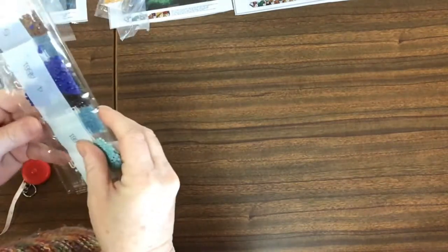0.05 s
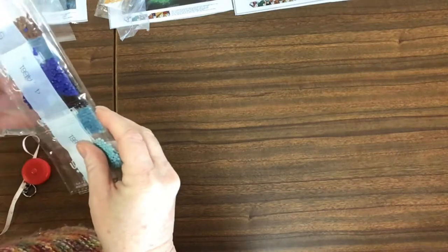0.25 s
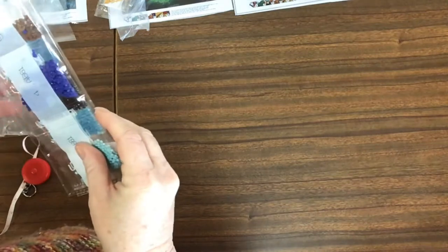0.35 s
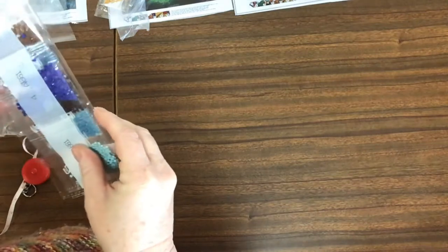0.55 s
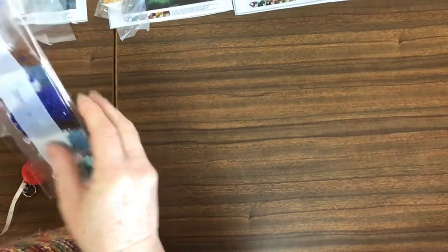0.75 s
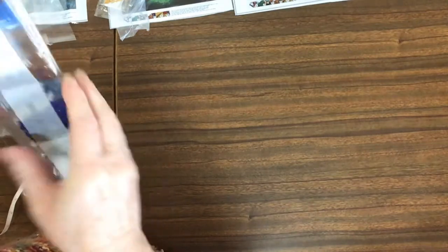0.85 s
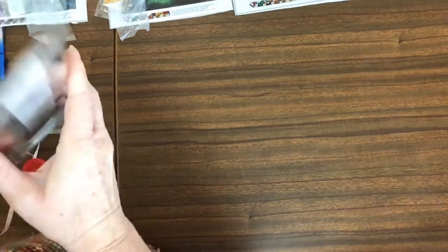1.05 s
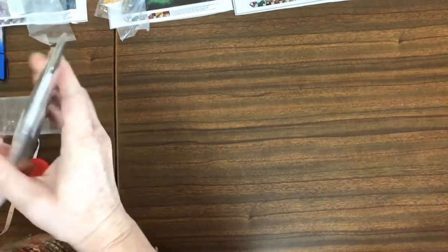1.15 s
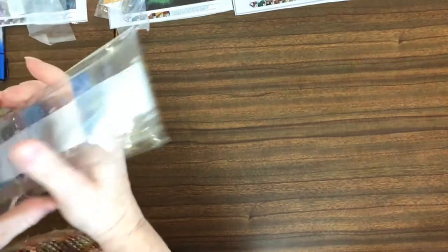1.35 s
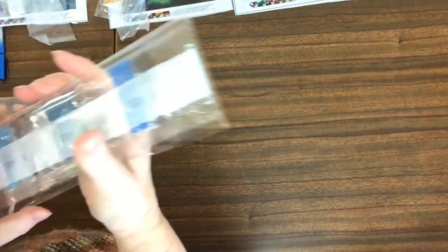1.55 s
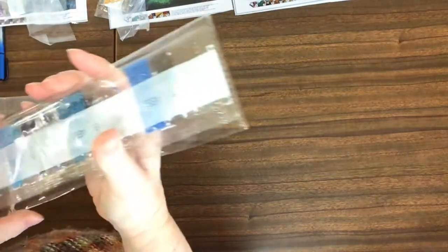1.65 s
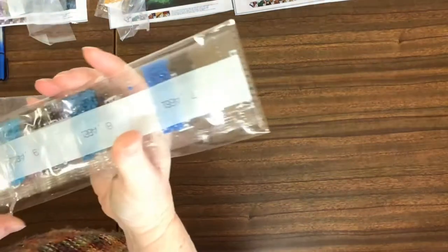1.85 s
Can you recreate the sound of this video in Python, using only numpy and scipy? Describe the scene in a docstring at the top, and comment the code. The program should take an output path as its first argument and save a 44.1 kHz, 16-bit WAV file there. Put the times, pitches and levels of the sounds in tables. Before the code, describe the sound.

Thin plastic packaging crinkles close by. A dull handling wash fades within 0.2 s as small crackles begin; sharp snaps stand out around 0.25, 0.45 and 0.55 s. Rustle swells near 0.7 s, then snaps crowd together at 1.0-1.45 s, strongest rustle near 1.15, with soft low knocks. A loud snap at 1.6 and a weaker one at 1.8 follow. Short small-room echo, faint low rumble.

```python
"""A thin plastic sleeve is turned over in two hands above a wooden desk, under a phone.
A dull wash is strongest at first and soon sinks, as creases begin to snap over a low rumble.
Snaps then come thickly, with tiny crackles, swells of rustle and soft knocks of the contents;
a few last snaps stand further apart. Each snap is a step with ragged buckling, rustle is
coloured noise, knocks are fading sines, and desk, near objects and a small room echo them."""
import sys
import numpy as np
from scipy import signal
from scipy.fft import rfft, irfft
from scipy.io import wavfile
from scipy.ndimage import uniform_filter1d

SR = 44100
rng = np.random.default_rng(int(sys.argv[2]) if len(sys.argv) > 2 else 0)


def decibels_to_gain(level_db):
    """Convert a level in decibels to a linear amplitude gain (20 dB per decade)."""
    exponent = np.asarray(level_db, float) / 20
    return 10 ** exponent


def transcribe(signal):
    """Save signal, clipped to [-1, 1], as a 16-bit WAV file at the path in sys.argv[1]."""
    frames = np.atleast_2d(signal).T
    limited = np.clip(frames, -1, 1)
    pcm = np.round(limited * 32767).astype(np.int16)
    wavfile.write(sys.argv[1], SR, pcm)


N = 83790


def curve(table, column=1):
    """Joins the points of a time table by straight lines."""
    points = np.array(table)
    return np.interp(np.arange(N) / SR, points[:, 0], points[:, column])


def on_hz(table, hz):
    """Joins the points of a spectrum on a log pitch axis."""
    points = np.array(table, float)
    return np.interp(np.log(hz + 1), np.log(points[:, 0]), points[:, 1])


def noise(table):
    """Noise of a given colour, rms 1."""
    spectrum = rfft(rng.standard_normal(N))
    x = irfft(spectrum * decibels_to_gain(on_hz(table, np.fft.rfftfreq(N, 1 / SR))), N)
    return x / x.std()


def walk(rate_hz):
    """Random wander with about rate_hz new values a second, spread 1."""
    hold = int(SR / rate_hz)
    steps = np.repeat(rng.standard_normal(N // hold + 1), hold)
    x = uniform_filter1d(steps, hold)[:N]
    return x / x.std()


def split(x):
    """Parts below and above the top of the main treble resonance."""
    split_hz = 10800
    low = signal.sosfilt(signal.butter(4, split_hz, fs=SR, output="sos"), x)
    high = signal.sosfilt(signal.butter(4, split_hz, "high", fs=SR, output="sos"), x)
    return low, high


# Colour of the room tone. Each row: pitch in Hz, relative level in dB per Hz.
TONE_COLOUR = [(12, -0.5), (25, 1.5), (50, -3), (100, -11.5), (200, -18), (600, -25), (1500, -28.5),
               (4000, -31), (9000, -56), (15500, -46), (16200, -70)]


def room_tone():
    """Steady noise, strongest in the deep bass: the low rumble."""
    return decibels_to_gain(-50) * noise(TONE_COLOUR)


# Loudness of the dull wash. Each row: time in seconds, level in dB.
WASH_LEVEL = [(0.0, -47), (0.052, -47), (0.21, -66), (0.364, -65.5), (0.956, -62.5), (1.28, -56.5),
              (1.434, -58.5), (1.602, -66), (1.9, -73)]
# Colour of the wash. Each row: pitch in Hz, relative level in dB per Hz.
WASH_TINT = [(60, -20), (220, 0), (1100, -2), (3000, -20), (8000, -45)]


def wash():
    """A dull mid-range noise, strongest at first, that wavers by 2.5 dB."""
    return noise(WASH_TINT) * decibels_to_gain(curve(WASH_LEVEL) + 2.5 * walk(29.98))


# Soft knocks of the contents. Each row: start in seconds, level in dB before its fade
# and soft onset, pitch in Hz.
SOFT_KNOCKS = [(0.063, -39, 263), (.716, -37, 334), (1.028, -37, 520), (1.11, -36.5, 650),
               (1.144, -38, 606), (1.143, -35, 337), (1.73, -45.5, 650)]


def knocks():
    """Short dull rings: sines with a soft onset and a quick fade."""
    t60_s, onset_s = 0.022, 0.00088
    t = np.arange(N) / SR
    total = np.zeros(N)
    for start, db, hz in SOFT_KNOCKS:
        age = np.maximum(t - start, 0)
        fade = decibels_to_gain(db - 60 * age / t60_s)
        total += fade * (1 - np.exp(-age / onset_s)) * np.sin(2 * np.pi * hz * age)
    return total


# Colour that the film gives to snaps and rustle. Each row: pitch in Hz, relative level in dB.
FILM_COLOUR = [(150, -24.5), (300, -20.5), (650, -7), (1150, -15), (1700, -8), (2150, -3.5), (2900, -10.5),
               (3800, -11), (4500, -14.5), (5300, -6.5), (7400, -3), (8500, 3), (10200, -4), (11300, -12),
               (15000, -19.5), (17000, -48.5)]
# How the hands work the film, for rustle and crackles. Each row: time in seconds,
# base level in dB, extra dB for the top treble of the rustle.
HANDS = [(0, -55, 8), (.1, -60, -13), (.22, -59, -7), (.26, -51, -8), (.32, -58.5, 0), (.5, -58, -7),
         (.65, -50.5, -6), (.69, -47, 8), (.78, -50.5, 2), (.87, -67, -4), (.895, -51.5, 3),
         (.95, -51.5, -2), (1.0, -54, 1), (1.09, -52.5, -10), (1.115, -42, 3), (1.15, -35.5, 1),
         (1.19, -48, -8), (1.22, -55, -3), (1.27, -44, 14), (1.35, -54, 2), (1.4, -50, -13),
         (1.5, -60.5, -12), (1.6, -52.5, -1), (1.75, -62.5, -9), (1.9, -65, 8)]
# Five pitches in Hz at which a snap may differ in colour; the fourth is the main treble.
TINT_HZ = (620, 2050, 3900, 7500, 13000)
TREBLE_FROM_HZ = TINT_HZ[3] * 2 / 3


def rustle():
    """Film-coloured noise that follows the hands and flickers both slowly and finely."""
    body_db = -1.5  # below the main treble the rustle is thinner than the snaps
    flicker_db, grain_db = 3, 4
    colour = [(hz, db + body_db * (hz < TREBLE_FROM_HZ)) for hz, db in FILM_COLOUR]
    body, top = split(noise(colour))
    level = curve(HANDS) + 0.5 + flicker_db * walk(120) + grain_db * walk(900)
    return (body + top * decibels_to_gain(curve(HANDS, column=2))) * decibels_to_gain(level)


def crackles():
    """A rain of small snaps at random times; most are faint, a few stand out."""
    per_s, base_db, spread_db, tint_db = 420, 12, 3.5, 6
    chance = rng.random((2000, 2))
    times = np.cumsum(-np.log(chance[:, 0])) / per_s
    keep = times < N / SR
    times = times[keep]
    hands = curve(HANDS)[(times * SR).astype(int)]
    db = hands + base_db - spread_db * np.log(chance[keep, 1] + 1 / 40)
    return snaps(times, db, tint_db * rng.standard_normal((len(times), 4)))


def snaps(times, db, tints_db):
    """A step and ragged buckling, coloured by the film, with a bounce off the desk.
    Returns the sound heard near and the sound sent all round."""
    size = 512  # samples per snap
    buckle_s, buckle_share = 0.00032, 0.54  # buckling that trails the first step
    desk_s, desk_db = 0.000681, -6.5
    count = len(times)
    hz, t = np.fft.rfftfreq(size, 1 / SR), np.arange(size) / SR

    # each patch of film rings a little differently
    patch = 1 + 0.04 * rng.standard_normal((count, 1))
    # no tint in the main treble, to which the levels refer
    tints = [np.interp(np.log(hz + 1), np.log(TINT_HZ), np.insert(row, 3, 0)) for row in tints_db]
    gain_db = on_hz(FILM_COLOUR, hz * patch) + np.array(tints)
    # folding the cepstrum makes the colour causal: nothing sounds before the step
    cepstrum = irfft(gain_db * np.log(10) / 20, size)
    cepstrum[:, 1:size // 2] *= 2
    cepstrum[:, size // 2 + 1:] = 0
    film = np.exp(rfft(cepstrum))

    push = buckle_share * rng.standard_normal((count, size)) * np.exp(-t / buckle_s)
    push[:, 0] += 1
    lag = desk_s * (1 + 0.2 * rng.standard_normal((count, 1)))
    ragged = rfft(push) * (1 + decibels_to_gain(desk_db) * np.exp(-2j * np.pi * hz * lag))
    # keep the fine raggedness, level out the broad colour
    ragged = ragged / np.sqrt(uniform_filter1d(abs(ragged) ** 2, size=11))
    smooth = np.ones_like(ragged)  # all round, the raggedness averages out
    spectra = np.array([ragged, smooth]) * film

    treble = (hz > TREBLE_FROM_HZ) & (hz < TINT_HZ[3] * 7 / 5)
    energy = 2 / size * np.sum(abs(spectra[..., treble]) ** 2, axis=2)
    spectra *= (decibels_to_gain(db) / np.sqrt(energy))[..., None]
    waves = irfft(spectra, size) * (t < t[-1] * 3 / 4)
    first = np.clip((times * SR).astype(int), 0, N - 1)
    where = (first[:, None] + np.arange(size)).ravel()
    return np.array([np.bincount(where, w.ravel(), N + size)[:N] for w in waves])


# Crease snaps. Each row: start in seconds, energy in the main treble in dB, then four tints
# in dB against the film colour, at the first, second, third and fifth pitch of TINT_HZ.
CREASES = [(0.0015, -27, 3, -1, -9, 9), (0.0231, -24, 4, 5, 8, 4), (0.0271, -15.5, 9, 13.5, -12, 8),
           (0.0527, -26, 18, 10, 2, -10), (0.068, -17, 0, -4, 5, -1), (0.102, -17, 3, 10, 4, -17),
           (0.1305, -23.5, 11, 6, 5, -6), (0.1383, -30, 19, 14, 14, -8), (0.1508, -14, 4, 4.5, 3, -7),
           (0.1836, -15.5, 11.5, 0, -1, 1.5), (0.2074, -21, 9, 2, -4, -7), (0.2269, -9, -7, 1.5, 1.5, 4),
           (0.2457, -4, 0, -4, 3, -1), (0.2554, -13, -16, -3, -11, 9), (0.2789, -24, 0, 7, 1, -7),
           (0.3236, -37, 20, 29, -1, -3), (0.3431, -5.5, -6, -8, -10, -7), (0.3945, -26.5, 9, 4, 0, -10),
           (0.4415, 0.5, -17, -1, -15, 6.5), (0.4577, -16.5, -6, -1, 6, 9),
           (0.539, 3.5, -10, -11.5, -16.5, 5.5), (0.5476, -22, 9, 14, 4, -2),
           (0.6003, -21.5, 13.5, 4.5, 6, 1), (0.6045, -17, 4.5, -17, -7, -19), (0.6078, -21, -11, 1, 0, -1),
           (0.6293, -23, 10, 14.5, 16, -5), (0.6442, -27, 22, 20, 12, -1), (0.657, -19, 3, -11, -2, -2),
           (0.6613, -1.5, -33, -5, -11.5, -13), (0.6658, -25, 17, -18, -4, -11),
           (0.676, -20, -7, -10, -10, 18), (0.6994, -5, 6, -7.5, -2, 5), (0.7039, -14, 7, 4.5, 2, 5),
           (0.7442, -24, -10, -6, 1, -3), (0.7561, -9, 4, 4.5, 4.5, 3), (0.7604, -20, -2, 4, 5, -2),
           (0.7725, -11, 3.5, -1, -20, -17), (0.803, -16.5, -16, -3, -2, -2),
           (0.8402, -13.5, -3.5, 10, -7, -3), (0.8836, -8.5, 1.5, 1, -2.5, 20.5),
           (0.893, -16, -12, -7, -1, 3), (0.904, -10.5, -12, -3, -12.5, -20), (0.9317, -24, -5, -7, -15, 9),
           (0.939, -24, 2, -10, -5, -1), (0.954, -20, -6, -4, 2, -3), (1.0157, -6.5, -16, 0.5, -23, -4),
           (1.0188, -18, 8, -1, 6, 7), (1.024, -18, 11, -35, -10, 17), (1.0274, -10, 3, 1, 0, 5),
           (1.039, -21, 4, 7, -4, 11), (1.0463, -22, 8, 8, -8, 1), (1.0572, -27, -2, 9, 1, -4),
           (1.0896, -38, 10, 17, 16, 4), (1.0969, -23, -2, 14, -5, 1), (1.107, -14.5, -12, 16, -8, -12),
           (1.11, -0.5, -1.5, -7.5, -8.5, -4), (1.1426, -6.5, 9.5, 2, -15, 0), (1.1432, -8.5, 6, 9, -9, -4),
           (1.1621, -7, -3, -16, -8, -6), (1.1658, -15.5, 19.5, -1, 10, 14), (1.1772, -13, -4, 4, -1, -6),
           (1.1857, -31.5, 25, 12, 0, 8), (1.2093, -35.5, 21, 33, 10, 7), (1.2219, -6, -19, -14, -4.5, -22),
           (1.2264, -18, -14, -16, 9, 3), (1.231, -9, 10, 4, -7, 16), (1.234, -16, -4, 4, -14, -4),
           (1.2403, -20, 2, 8, -16, 0), (1.2542, -22.5, 12, 13, 11, 2), (1.2613, -23, 20, 24, 7, 20),
           (1.2652, -9.5, -4, 7.5, 0, 1), (1.2818, 0, -1.5, -4.5, -2, 13), (1.292, -20, -4, 3, -1, 0),
           (1.309, -25, 4, -5, -10, -1), (1.3277, -5, -1, 16.5, 5, 9.5), (1.3368, 2.5, -6.5, -0.5, 7, 5),
           (1.355, -22, -10, 11, 1, -2), (1.3679, -2.5, -9.5, 1.5, -5, 9.5), (1.4182, 3.5, -9, -10, -5, -1),
           (1.4309, -23, -12, 22, 6, 5), (1.4596, 5.5, -14, -4.5, -1.5, 10.5),
           (1.6009, 7, -5.5, -0.5, 1.5, 1.5), (1.6345, -25, -3, -7, 16, 10),
           (1.8253, -10.5, -6, -5, -2, -2.5)]


def creases():
    """The big snaps, as creases jump through one by one."""
    rows = np.array(CREASES, float)
    return snaps(rows[:, 0], rows[:, 1], rows[:, 2:])


def sleeve():
    """All sounds of the sleeve and its contents, as heard near and as sent all round."""
    return creases() + crackles() + knocks() + rustle()


# Echoes off nearby surfaces. Each row: delay in seconds, level in dB.
NEAR_ECHOES = [(.0043, -17), (.0087, -19.5), (.0115, -26)]
# Colour of the diffuse tail, fuller in the middle. Each row: pitch in Hz, relative level in dB.
TAIL_COLOUR = [(400, 3), (1200, 3), (2100, 0), (3200, 6), (4500, 5), (6500, 1), (9000, 0), (14000, 0)]


def room(near, around):
    """Adds a few smeared early echoes and a diffuse tail of fading noise."""
    tail_db, t60_s, treble_t60_s = -15.5, 0.37, 0.33
    build_up_s, smear_s = 0.0023, 0.00023
    t = np.arange(SR // 2) / SR
    low, high = split(rng.standard_normal(len(t)))
    tail = low * decibels_to_gain(-60 * t / t60_s) + high * decibels_to_gain(-60 * t / treble_t60_s)
    tail *= 1 - np.exp(-(t / build_up_s) ** 2)
    colour = decibels_to_gain(on_hz(TAIL_COLOUR, np.fft.rfftfreq(len(t), 1 / SR)))
    tail = irfft(rfft(tail) * colour, len(t))
    response = tail * decibels_to_gain(tail_db) / np.sqrt(np.sum(tail ** 2))
    for delay, db in NEAR_ECHOES:
        burst = rng.standard_normal(len(t)) * (t > delay) * np.exp(-abs(t - delay) / smear_s)
        response += decibels_to_gain(db) * burst / np.sqrt(np.sum(burst ** 2))
    return near + signal.fftconvolve(around, response)[:N]


def scene():
    """The sleeve in the room, over the wash and the room tone."""
    near, around = sleeve()
    return (room_tone() + wash() + room(near, around))[None]


def band_limit(x):
    """A steep low-pass at the top of the band."""
    return signal.sosfilt(signal.butter(12, 16990, fs=SR, output="sos"), x)


def record(dry):
    """The phone rounds the highest peaks and cuts the top treble."""
    ceiling, top_hz = 0.95, 16250
    soft = dry / (1 + (abs(dry) / ceiling) ** 4) ** (1 / 4)
    top_cut = signal.ellip(8, 0.3, 60, top_hz, fs=SR, output="sos")
    mix = signal.sosfilt(top_cut, soft)
    return band_limit(mix)


dry = scene()
out = record(dry)
transcribe(out)
```